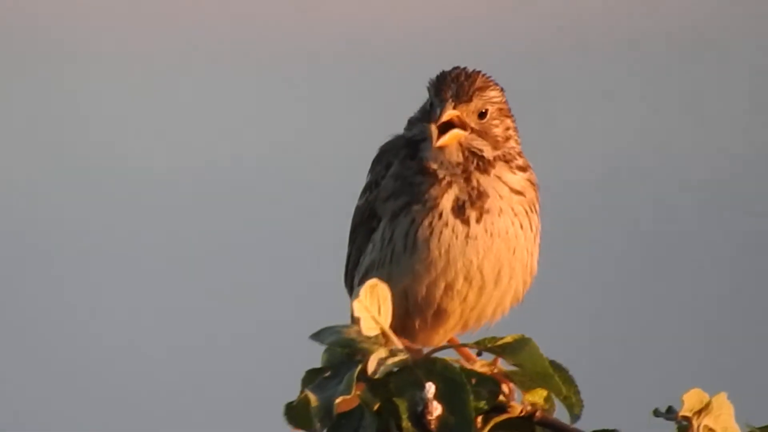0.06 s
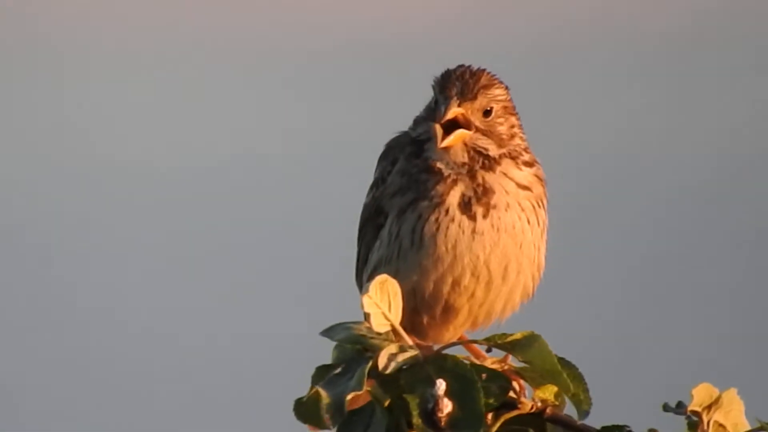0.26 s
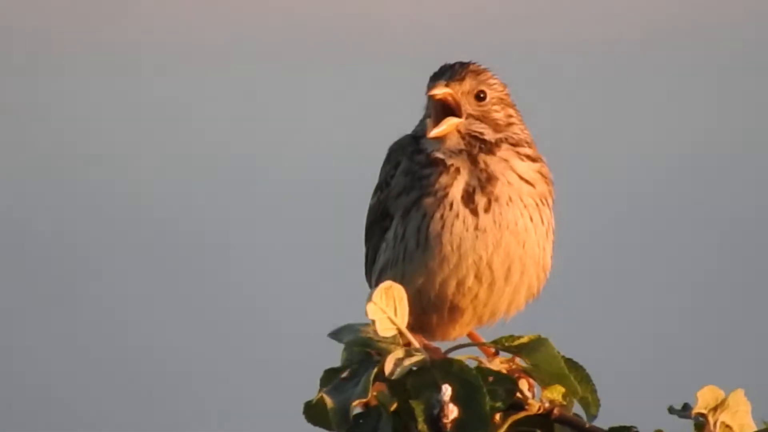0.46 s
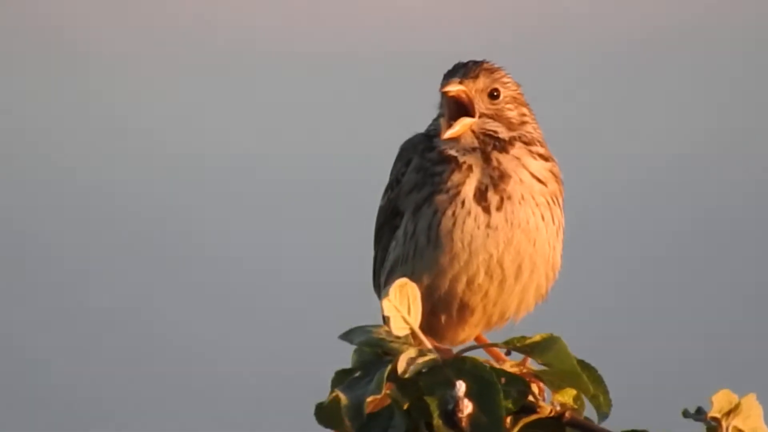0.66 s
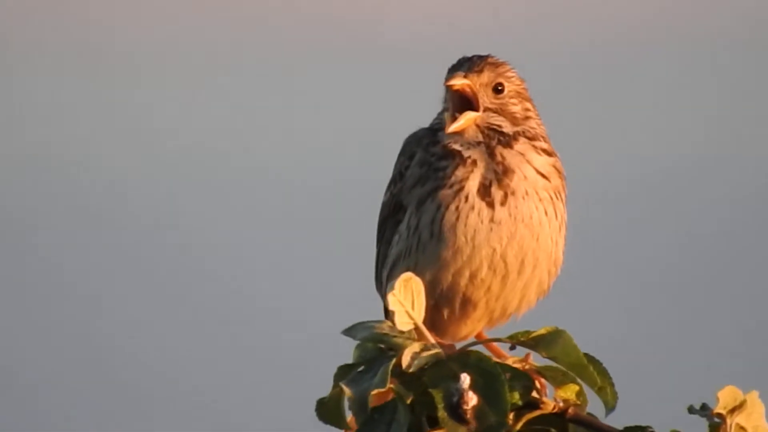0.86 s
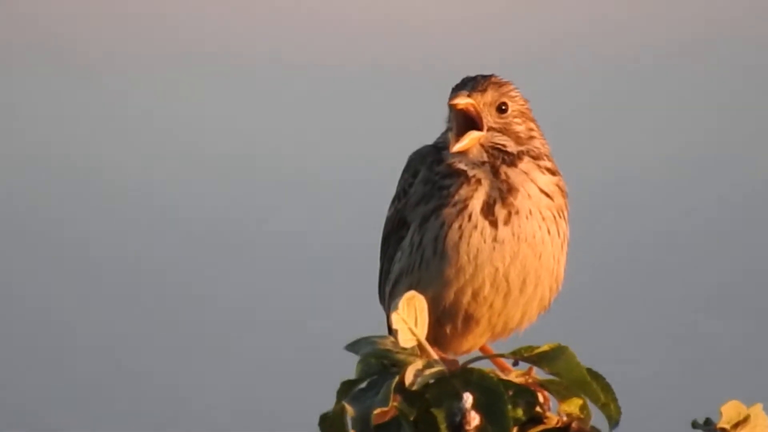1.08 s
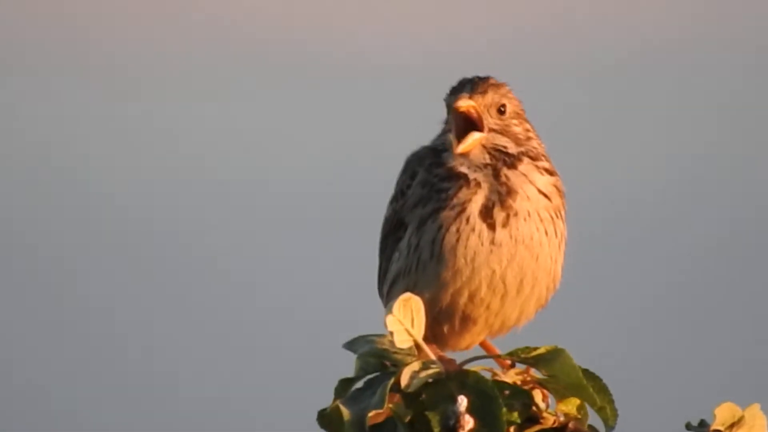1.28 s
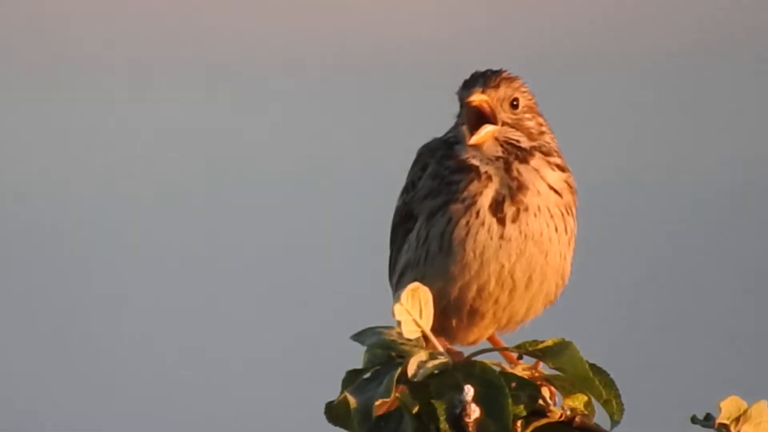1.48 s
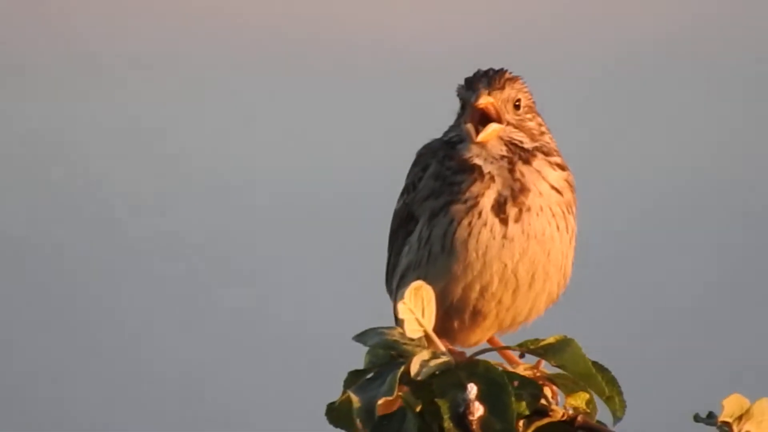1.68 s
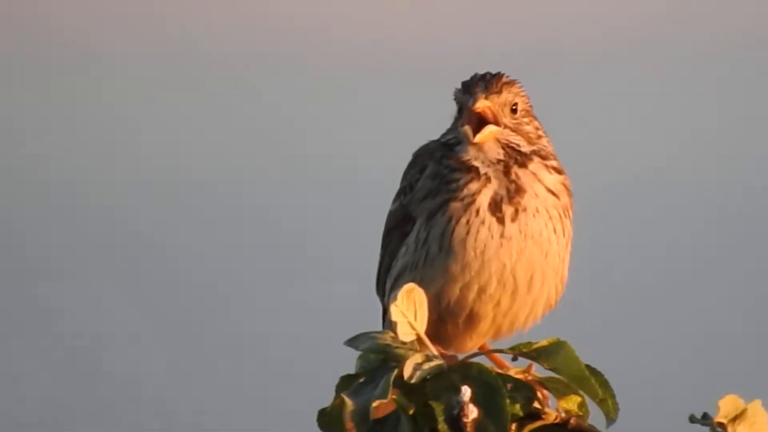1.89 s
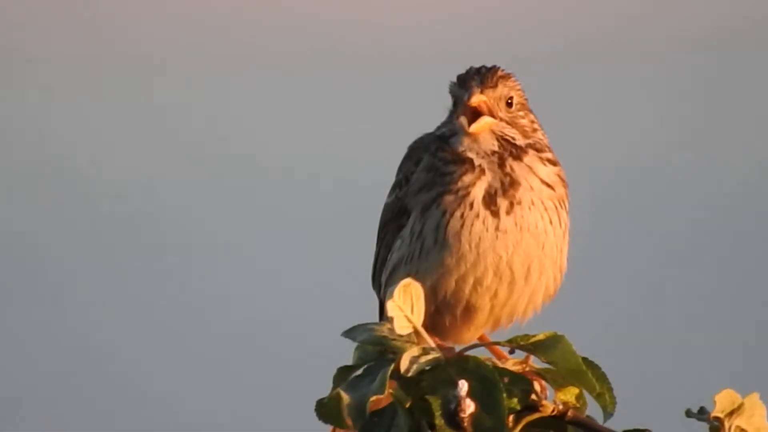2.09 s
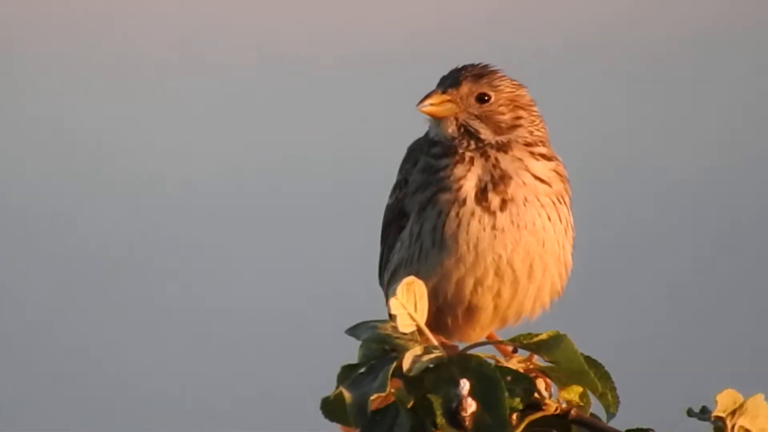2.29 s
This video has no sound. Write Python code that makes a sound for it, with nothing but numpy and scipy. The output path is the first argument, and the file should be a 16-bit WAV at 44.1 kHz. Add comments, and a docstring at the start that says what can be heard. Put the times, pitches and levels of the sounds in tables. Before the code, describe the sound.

One small bird sings outdoors from a bush, starting with accelerating ticks, breaking into a high, jingling rattle and trailing off in short falling notes. Two faint chirps follow, with soft low wind behind and barely any echo.

```python
"""Open country: a distant wash, low wind and a faint hum run throughout. After a faint chirp, a corn
bunting sings once from a bush, its syrinx whistling near sines: ticks that speed up, a dry crackle of
fast glides, a jangle of buzzes and high pips, then a run of falling slurs. Leaves scatter the notes,
the field returns a faint tail and further bushes echo. Two faint chirps come last."""
import sys
import numpy as np
from scipy import signal
from scipy.fft import rfft, irfft
from scipy.io import wavfile
from scipy.ndimage import uniform_filter1d

SR = 44100
rng = np.random.default_rng(int(sys.argv[2]) if len(sys.argv) > 2 else 0)


def wrap_up_sound(samples):
    """Save the sound to the file named by the first command line argument, as 16-bit audio."""
    columns = np.atleast_2d(samples).T
    # keep every value between -1 and 1, then stretch to whole-number steps
    tamed = np.clip(columns, -1, 1)
    steps = np.round(tamed * 32767).astype(np.int16)
    wavfile.write(sys.argv[1], SR, steps)


N = 108045
TIME, FREQS = np.arange(N) / SR, np.fft.rfftfreq(N, 1 / SR)
ATTACK_S, RELEASE_S, RASP_S = 0.0017, 0.00097, 0.0013
OVERBLOWN_HZ = 8100  # above this the beak favours the second harmonic; the fundamental lies below


def amp(db):
    """Decibels to gain."""
    return 10 ** (np.asarray(db) / 20)


def unit(x):
    """Scales to rms 1."""
    return x / np.sqrt(np.mean(x ** 2) + 1e-20)


def over_freq(points):
    """Joins (Hz, value) points on a log frequency axis."""
    hz, value = np.transpose(points)
    return np.interp(np.log(FREQS + 1), np.log(hz + 1), value)


def over_time(points):
    """Joins (s, value) points with straight lines."""
    return np.interp(TIME, *np.transpose(points))


def drift(seconds, size=N):
    """Smooth random motion of rms 1."""
    lowpass = np.exp(-(np.fft.rfftfreq(size, 1 / SR) * seconds) ** 2)
    return unit(irfft(rfft(rng.standard_normal(size)) * lowpass, size))


def gate(t, length_s, attack_s, release_s):
    """Linear attack, hold and release."""
    return np.clip(t / attack_s, 0, 1) * np.clip((length_s - t) / release_s, 0, 1)


def noise_pair(spectrum, coherence):
    """Coloured noise, partly shared by the two microphones."""
    left, other = rfft(rng.standard_normal((2, N)))
    right = coherence * left + np.sqrt(1 - coherence ** 2) * other
    return unit(irfft(np.array([left, right]) * amp(over_freq(spectrum)), N))


def distant_wash():
    """The broad noise of open country, swelling slowly."""
    # Each row: frequency in Hz, relative density in dB.
    spectrum = [(15, -41), (25, -26), (43, -18), (53, -12), (144, 2), (233, 1), (297, -4.5), (741, -1),
                (895, -4), (1020, -3), (1950, -13), (3530, -17.5), (4750, -12), (5140, -9), (5580, -15.5),
                (6380, -9), (6920, -20), (7700, -17.5), (15500, -31)]
    # Each row: frequency in Hz, left-right coherence.
    coherence = [(40, .2), (130, 0.48), (300, 0.84), (700, 0.89), (1500, 0.62), (3000, 0.24), (8000, 0.067)]
    # Each row: time in seconds, gain in dB.
    swell = [(0, 0), (.3, 1.5), (.65, 2), (1.0, -.5), (1.5, .5), (2.0, -1.5), (2.45, -1)]
    return amp(-53 + over_time(swell)) * noise_pair(spectrum, over_freq(coherence))


def wind():
    """Low wind that comes and goes, with small gusts at each microphone."""
    # Each row: frequency in Hz, relative density in dB.
    spectrum = [(25, -18.5), (65, -13.5), (85, -17), (135, 0.5), (200, -4.5), (320, -13), (1000, -35.5),
                (4000, -80)]
    # Each row: time in seconds, gain in dB.
    strength = [(0, -4.5), (.2, -3), (.27, 6), (.33, -3), (.39, 4), (.45, -3.5), (.51, 6), (.58, 0),
                (.77, 4.5), (.87, -0.5), (1.1, -4), (1.3, 3), (1.6, -1.5), (1.95, -3.5), (2.12, -1),
                (2.3, -5), (2.45, -0.5)]
    gust_db, gust_s = 2, 0.04
    gusts = amp(gust_db * np.array([drift(gust_s), drift(gust_s)]))
    return amp(-57.5 + over_time(strength)) * unit(gusts * noise_pair(spectrum, coherence=0.49))


def hum():
    """A faint wavering hum far away."""
    # Each row: time in seconds, level in dB.
    level = [(0, -66), (.5, -65), (1.0, -66.5), (2.45, -78.5)]
    hz = 374 + 4.81 * drift(0.08)
    return amp(over_time(level)) * unit(np.sin(2 * np.pi * np.cumsum(hz) / SR))


def whistle(hz, octave_db=-21.5, under_db=None):
    """The syrinx: a near sine with a weak octave above and optionally one below."""
    phase = 2 * np.pi * np.cumsum(hz) / SR
    tone = np.sin(phase) + amp(octave_db) * np.sin(2 * phase) * (4 * hz < SR)
    return tone if under_db is None else tone + amp(under_db) * np.sin(phase / 2)


def sing(note, rows):
    """Plays one note per row, with slight random pitch jitter."""
    out, jitter = np.zeros(N), 1 + 0.0071 * drift(0.00083)
    for start_s, length_s, db, *shape in rows:
        on = (TIME >= start_s) & (TIME < start_s + length_s)
        out[on] += amp(db) * note(TIME[on] - start_s, jitter[on], length_s, *shape)
    return out


def chirps():
    """Soft notes of nearly level pitch."""
    # Each row: start and length in seconds, gain in dB, pitch in Hz.
    rows = [(0.0, 0.0055, -26, 4174), (2.337, 0.019, -39.5, 4395), (2.396, 0.01306, -42.5, 5103)]

    def note(t, jitter, length_s, hz):
        bow_hz = 150 * (2 * t / length_s - 1) ** 2
        return whistle((hz + bow_hz) * jitter, octave_db=-17) * np.sin(np.pi * t / length_s)
    return sing(note, rows)


def ticks():
    """Hooked notes that drop fast, then sag slowly and fade."""
    # Each row: start and length in seconds, gain in dB, first and last pitch in Hz.
    rows = [(0.1748, 0.019, -22, 6690, 4260), (0.3339, 0.01762, -20, 6690, 4295),
            (0.4414, 0.019, -20, 6750, 4323), (0.5335, 0.019, -18, 6970, 4420),
            (1.6573, 0.032, -26, 6460, 4686), (1.801, 0.035964, -27.5, 6300, 4680)]
    drop_s, release_s, sag_hz_per_s, fade_db = 0.0065, 0.002, 5200, -7.5

    def note(t, jitter, length_s, first_hz, last_hz):
        floor_hz = last_hz + sag_hz_per_s * (length_s - release_s - t)
        hz = floor_hz + (first_hz - floor_hz) * np.exp(-(t / drop_s) ** 2.02)
        envelope = gate(t, length_s, ATTACK_S, release_s) * amp(fade_db * t / length_s)
        return whistle(hz * jitter, octave_db=-17) * envelope
    return amp(0.85) * sing(note, rows)


def crackle():
    """Raspy glides so fast that they sound like clicks."""
    # Each row: start and length in seconds, gain in dB, first and last pitch in Hz.
    rows = [(0.612, 0.0053, -32, 4330, 8500), (0.617, 0.0057, -28.5, 9170, 4000),
            (0.622, 0.004462, -19.5, 5450, 7300), (0.683, 0.0066, -31, 4330, 8500),
            (0.689, 0.006403, -28, 9170, 4060), (0.693, 0.0047, -17, 5500, 7750),
            (0.706, 0.0077, -23.5, 4170, 10920), (0.711, 0.0058, -25, 9570, 5060),
            (0.7145, 0.0045, -24.5, 5730, 10300), (0.723, 0.0073, -28.5, 4340, 9030),
            (0.7324, 0.004, -23, 3930, 9600), (0.736, 0.0038, -23.5, 4440, 9900),
            (0.746, 0.0066, -25.5, 3910, 8300), (0.753, 0.0049, -27.5, 4050, 9970),
            (0.757, 0.0043, -23.5, 4500, 10200), (0.7675, 0.005804, -28, 4040, 8600),
            (0.7753, 0.0073, -24, 3930, 9950), (0.7817, 0.0028, -26, 4500, 10050),
            (0.829, 0.0052, -22.5, 5790, 7692), (0.9303, 0.0042, -25, 5530, 8000),
            (1.432, 0.0098, -38.5, 4040, 9400), (1.445, 0.0063, -38, 5640, 9600),
            (1.456, 0.0051, -28, 10870, 7900), (1.4604, 0.00611, -31, 7070, 10900),
            (1.575, 0.0035, -23, 3480, 9860)]

    def note(t, jitter, length_s, first_hz, last_hz):
        hz = first_hz + (last_hz - first_hz) * t / length_s
        tone = whistle(hz * jitter, under_db=-3 if max(first_hz, last_hz) > OVERBLOWN_HZ else None)
        rasp = 1 + 0.3412 * drift(RASP_S, size=4096)[:len(t)]
        return tone * rasp * gate(t, length_s, attack_s=length_s / 2, release_s=0.00086)
    return amp(-2.47) * sing(note, rows)


def sizzle(notes):
    """Hiss of air through the syrinx, following the strength of the notes."""
    # Each row: frequency in Hz, relative density in dB.
    spectrum = [(2000, -26), (4000, -7), (8000, 0), (10500, -3), (12500, -6), (15500, -6.5)]
    hiss = unit(irfft(rfft(rng.standard_normal(N)) * amp(over_freq(spectrum)), N))
    return hiss * uniform_filter1d(abs(notes), size=24)


def buzzes():
    """Swelling, raspy notes whose pitch and strength shake hundreds of times a second."""
    # Each row: start and length in seconds, gain in dB, then pitch, trill depth and trill rate in Hz.
    rows = [(0.8015, 0.024, -26.5, 4805, 159, 285), (0.851, 0.046, -21.5, 8223, 750, 342),
            (0.937, 0.016, -25, 4900, 303, 330), (0.953, 0.015753, -25, 4760, 330, 350),
            (0.974, 0.029, -29.5, 4870, 200, 280), (0.978, 0.024, -17, 6930, 424, 266),
            (0.993, 0.013, -22.5, 4800, 278.6, 250), (1.013, 0.02786, -20, 4720, 380, 400),
            (1.048, 0.015, -32, 4844, 200, 280), (1.076, 0.015, -29, 5010, 200, 290),
            (1.092, 0.0076, -18.5, 4980, 244.7, 244), (1.1027, 0.016, -24.5, 4886, 188.2, 260),
            (1.121, 0.012, -24.5, 5170, 200, 255), (1.1345, 0.0078, -21.5, 5070, 63, 150),
            (1.146, 0.011, -30, 5190, 200, 250), (1.157, 0.014, -17, 5510, 537, 400),
            (1.185, 0.0098, -18.5, 5240, 177, 200), (1.2304, 0.024, -21, 5170, 198.8, 426),
            (1.249, 0.02, -23.5, 5010, 100, 374), (1.2748, 0.0047, -19, 5010, 337, 260),
            (1.2926, 0.048, -20.5, 4740, 340, 352), (1.3772, 0.01, -18.5, 5352, 256, 270),
            (1.3919, 0.010363, -16.5, 5570, 518, 460), (1.423, 0.0251, -32, 5270, 450, 212.2)]
    swell_db = 8

    def note(t, jitter, length_s, hz, depth_hz, rate_hz):
        trill_hz = rate_hz * (1 + 0.17 * drift(0.0031, size=4096)[:len(t)])
        trill_rad = 2 * np.pi * np.cumsum(trill_hz) / SR
        pitch_hz = (hz + depth_hz * np.sin(trill_rad)) * jitter
        tone = whistle(pitch_hz, octave_db=-14.5, under_db=-5.5 if hz + depth_hz > OVERBLOWN_HZ else None)
        throb = 0.45 * np.cos(trill_rad)
        rasp = 0.2 * drift(RASP_S, size=4096)[:len(t)]
        envelope = gate(t, length_s, RELEASE_S, RELEASE_S) * amp(swell_db * (t / length_s - 1.5))
        return tone * (1 + throb + rasp) * envelope
    return amp(0.9) * sing(note, rows)


def pips():
    """Short high notes: glides that bow downward in the middle."""
    # Each row: start and length in seconds, gain in dB, mid pitch and glide in Hz.
    rows = [(0.838, 0.0037, -21, 7450, 994), (0.8394, 0.0059, -22, 6920, 483),
            (0.969, 0.0056, -19.5, 6680, -830), (1.0435, 0.0091, -20, 6950, -168),
            (1.0554, 0.003, -14.5, 7297, 1000), (1.0727, 0.0071, -16.5, 6868, 85),
            (1.085, 0.003, -18.5, 7020, -30), (1.123, 0.0066, -19, 7180, -501),
            (1.1289, 0.0053, -18, 6760, 476), (1.1443, 0.007, -17.5, 7140, 427),
            (1.172, 0.0078, -17, 6940, 415), (1.1814, 0.0043, -17.5, 6977, -910),
            (1.1956, 0.0047, -20, 7020, -266), (1.2675, 0.00468, -17.5, 7070, -103),
            (1.2802, 0.006, -18.5, 7100, 790), (1.3509, 0.0092, -15.5, 7150, -55),
            (1.3608, 0.0077, -15, 7310, -295), (1.426, 0.0035, -22.5, 7320, -516),
            (1.4342, 0.0031, -15, 7200, 594.5), (1.577, 0.0065, -28, 7300, 210.5)]
    bow_hz, edge_s = 410, 0.0014

    def note(t, jitter, length_s, mid_hz, glide_hz):
        from_mid = t / length_s - 0.5
        hz = mid_hz + glide_hz * from_mid + bow_hz * (2 * from_mid) ** 2
        return whistle(hz * jitter) * gate(t, length_s, edge_s, edge_s)
    return amp(-0.85) * sing(note, rows)


def slurs():
    """Notes that settle on a pitch, plain or trilled, then fall in an S-curve and weaken."""
    # Each row: start and length in seconds, gain in dB, then held pitch, last pitch,
    # trill depth and trill rate in Hz.
    rows = [(1.062, 0.0052, -15.5, 6920, 5160, 0, 0), (1.1108, 0.0092, -20.5, 7070, 5000, 0, 0),
            (1.208, 0.021, -14.5, 7370, 5250, 274, 365), (1.37, 0.0041, -24, 6120, 5000, 0, 0),
            (1.409, 0.012, -18.5, 6900, 5040, 0, 0), (1.451, 0.013, -21, 6081, 4230, -2.5, 0),
            (1.464, 0.029, -20, 7440, 5070, 209, 395), (1.4887, 0.028, -19, 7340, 5090, 349, 369),
            (1.559, 0.012, -21, 5760, 5200, 13, -2), (1.584, 0.026, -18.5, 7290, 5280, 150, 365),
            (1.607, 0.024, -18.5, 7390, 5400, 124, 322), (1.693, 0.031, -19, 7333, 5250, -12, -8),
            (1.765, 0.014, -19.5, 7223, 5450, 0, 3), (1.855, 0.015, -22.5, 5710, 5020, -4, 2.5),
            (1.9047, 0.017, -23.5, 7160, 5230, 0, 0), (1.9527, 0.017, -21.5, 7180, 5100, 0, 0),
            (2.0044, 0.017, -21, 7250, 5100, 6, -2.5), (2.0547, 0.016, -22.5, 7210, 5310, 0, 0),
            (2.105, 0.016, -24, 6970, 5160, 0, -13), (2.16, 0.013, -25, 7210, 5899, -2, 0),
            (2.222, 0.011, -30.5, 7310, 5960, 0, 0)]
    scoop_hz, scoop_s, fall_s, fall_db = 376.4, 0.0021, 0.015, -10

    def note(t, jitter, length_s, held_hz, last_hz, depth_hz, rate_hz):
        progress = np.clip(1 - (length_s - t) / min(length_s, fall_s), 0, 1)
        fall = np.sin(np.pi / 2 * progress ** 1.41) ** 2
        hz = held_hz + (last_hz - held_hz) * fall + scoop_hz * np.exp(-t / scoop_s)
        hz += depth_hz * (1 - fall) * np.sin(2 * np.pi * rate_hz * t)
        return whistle(hz * jitter) * gate(t, length_s, ATTACK_S, RELEASE_S) * amp(fall_db * fall)
    return amp(-0.23) * sing(note, rows)


def song():
    """All notes and their hiss, filtered by the beak."""
    # Each row: frequency in Hz, gain in dB.
    beak = [(2400, -19.5), (3500, -15), (4200, 1), (8000, 1.5), (10000, -6), (12000, -5.5), (14000, -18.5),
            (16000, -26.5)]
    clicks, trills = crackle(), buzzes()
    clear = ticks() + pips() + slurs() + chirps()
    hiss = sizzle(amp(-9.5) * clicks + amp(-17) * trills)
    return irfft(rfft(clear + clicks + trills + hiss) * amp(over_freq(beak)), N)


def scatter(x, delay_s, t60_s):
    """Many small reflections that die away, different at each microphone."""
    t = TIME[:SR // 2]
    taps = rng.standard_normal((2, len(t))) * (rng.random((2, len(t))) < 0.2)
    taps *= (t > delay_s) * amp(-60 * t / t60_s)
    taps /= np.linalg.norm(taps, axis=1, keepdims=True)
    return signal.fftconvolve(x[None], taps, axes=1)[:, :N]


def open_country(direct):
    """Sound reaches the microphone pair straight and by way of leaves, field and bushes."""
    # Each row: frequency in Hz, direct gain of left over right in dB.
    left_gain = [(3300, 2.5), (4200, -12), (4700, -21), (5000, -8.5), (5600, 0), (6000, -4), (6400, -0.5),
                 (7100, -14.5), (7800, -8.5), (9200, -4.5)]
    # Each row: frequency in Hz, phase lead of left over right in radians.
    left_lead = [(4200, -1.5), (4400, -1.34), (4700, -5.5), (5300, -8.5), (6000, -7.5), (7100, -8.5),
                 (7400, -9), (9200, -8.5)]
    # Each row: echo delay in seconds, gain in dB.
    far_bushes = [(.063, -30.5), (.08, -36.5)]
    left_response = amp(over_freq(left_gain)) * np.exp(1j * over_freq(left_lead))
    left = irfft(rfft(direct) * left_response, N)
    leaves = amp(-13) * scatter(direct, delay_s=0.0025, t60_s=0.051)
    field = amp(-21.5) * scatter(direct, delay_s=0.004, t60_s=0.35)
    bushes = sum(amp(db) * np.interp(TIME - delay_s, TIME, direct, left=0) for delay_s, db in far_bushes)
    echoes = leaves + field + bushes
    return np.array([left + amp(1) * echoes[0], direct + echoes[1]])


def scene():
    """The bird over its background."""
    return open_country(song()) + distant_wash() + wind() + hum()


def record(dry):
    """The recorder's band limit."""
    cutoff_hz = 15950
    lowpass = signal.firwin(511, cutoff_hz, window=("kaiser", 9), fs=SR)
    return signal.oaconvolve(dry, lowpass[None], "same")


dry = scene()
out = record(dry)
wrap_up_sound(out)
```